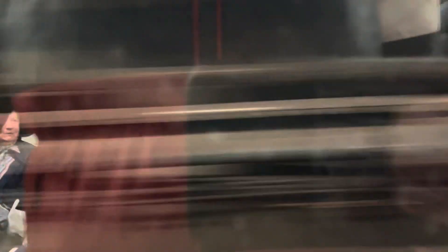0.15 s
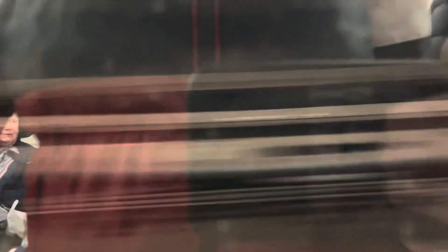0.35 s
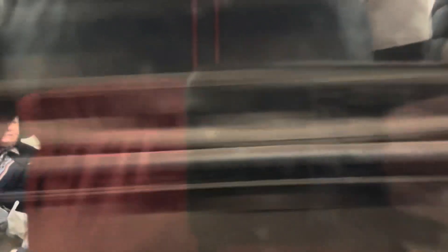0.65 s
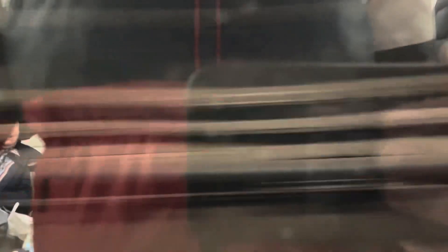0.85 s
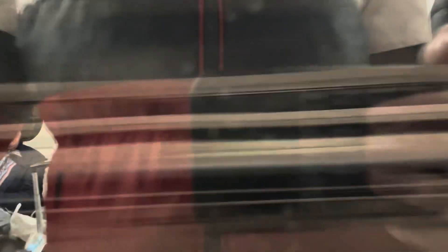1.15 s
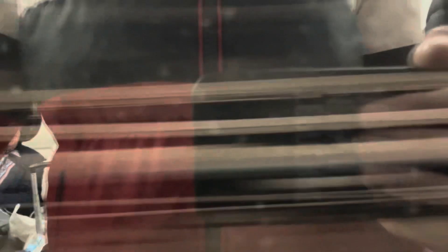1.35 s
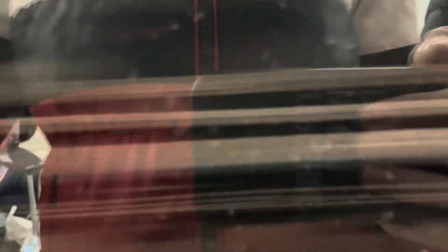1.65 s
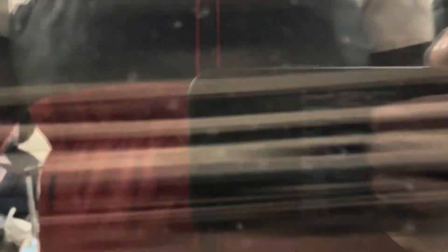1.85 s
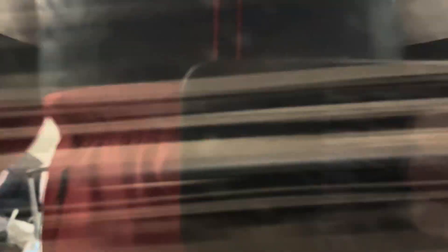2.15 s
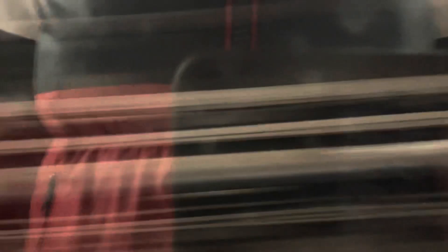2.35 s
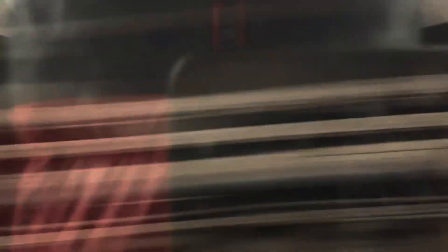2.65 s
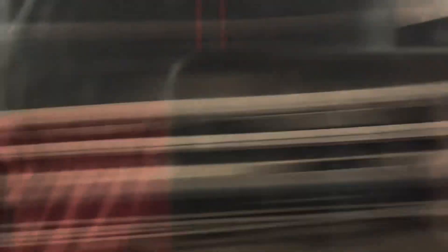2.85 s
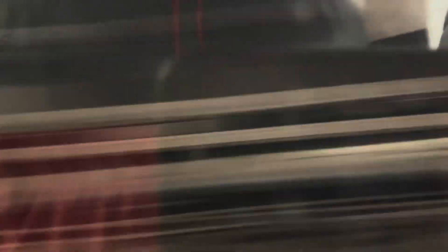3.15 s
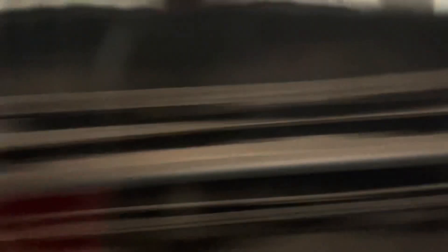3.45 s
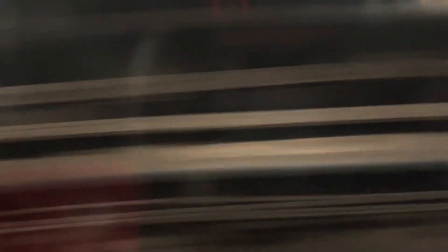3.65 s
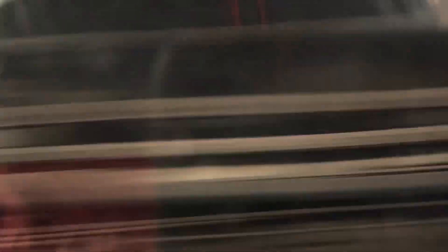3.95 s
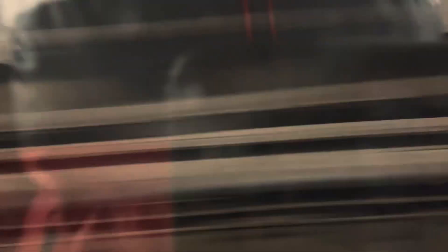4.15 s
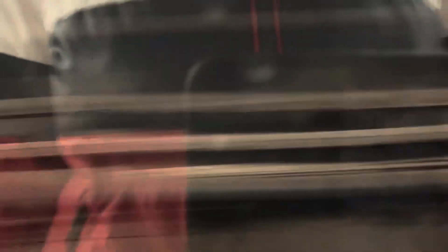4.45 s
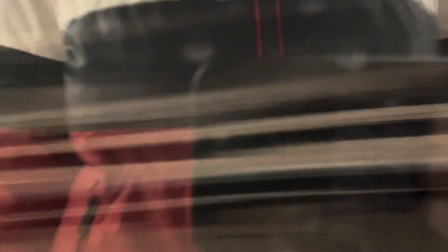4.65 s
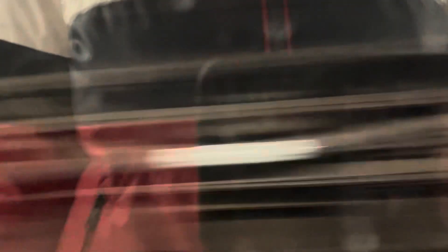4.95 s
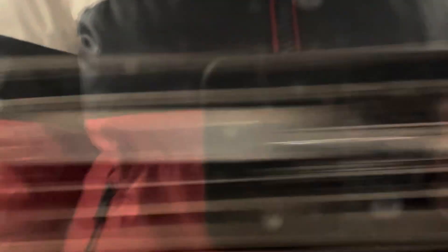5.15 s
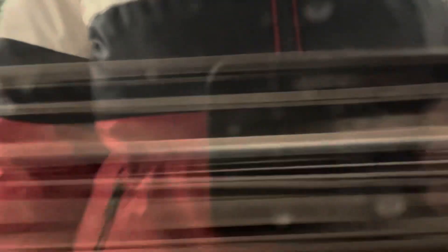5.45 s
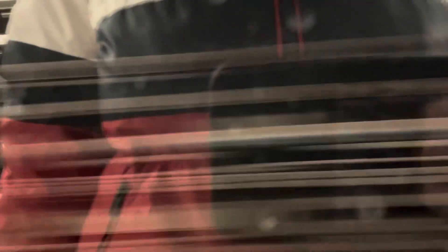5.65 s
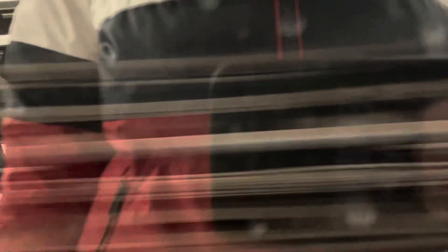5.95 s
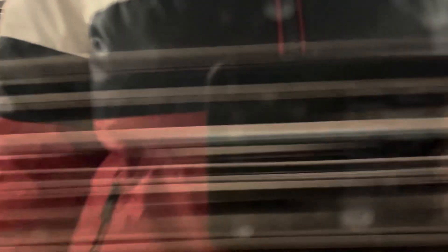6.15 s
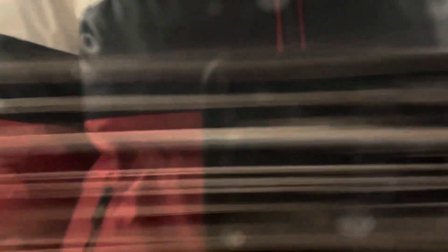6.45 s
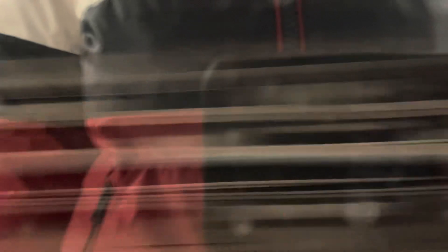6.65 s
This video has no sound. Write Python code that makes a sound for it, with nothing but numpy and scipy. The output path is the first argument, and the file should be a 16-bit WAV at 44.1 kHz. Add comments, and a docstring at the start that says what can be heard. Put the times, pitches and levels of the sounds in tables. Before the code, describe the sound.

Inside a metro car speeding steadily through a tunnel, wheels sing a wavering mid-low drone over deep rumble, roar and hiss, with brief metallic squeaks.

```python
"""Inside a metro train at steady speed in a tunnel, on two close microphone ports at a window seat.
From the start the wheels sing near 400 Hz on rippled rails: a wavering tone against narrow beating noise.
Under and around it, shaped noise makes the body's boom, rumble, panels, tunnel roar, ringing rails, hiss and air.
Scuffs of swelling grainy noise are there from the first moment, and low jolts come mostly after four seconds.
Squeaks, ragged gliding tones that ring on briefly in the car, cluster early and midway, with one near the end."""
import sys
import numpy as np
from scipy import signal
from scipy.fft import next_fast_len
from scipy.io import wavfile
from scipy.ndimage import uniform_filter1d

SR = 44100
rng = np.random.default_rng(int(sys.argv[2]) if len(sys.argv) > 2 else 0)


def generate_wav(sig):
    """Save sig (samples, or channels by samples) to the path in sys.argv[1] as 16-bit PCM at SR."""
    pcm = np.round(np.clip(np.atleast_2d(sig).T, -1, 1) * 32767).astype(np.int16)
    wavfile.write(sys.argv[1], SR, pcm)


N = 300757
TIME = np.arange(N) / SR


def undb(db):
    """Decibels to gain."""
    return 10 ** (np.asarray(db) / 20)


def curves(table):
    """Every column of a table of times, sample by sample."""
    s, *columns = np.transpose(table)
    return [np.interp(TIME, s, column) for column in columns]


def swells(table):
    """Change in dB: each (middle s, length s, dB) event builds and falls away as a smooth bell."""
    total_db = 0
    for s, length, db in table:
        phase = np.clip((TIME - s) / length, -.5, .5)
        total_db = total_db + db * np.cos(np.pi * phase) ** 2
    return total_db


def along(points, f):
    """Read (Hz, value) points on a log-frequency axis."""
    hz, value = np.transpose(points)
    return np.interp(np.log(f), np.log(hz), value)


def along_db(spectrum, f, skirt_db=12):
    """Gain of a (Hz, dB) spectrum; above its last point it falls by skirt_db an octave."""
    octaves_above = np.log2(np.maximum(f / spectrum[-1][0], 1))
    return undb(along(spectrum, f) - skirt_db * octaves_above)


def resonances(modes, f):
    """Gain of steep-sided resonances (Hz, width Hz, dB) whose powers add."""
    power = 0
    for hz, width, db in modes:
        detuning = (f - hz * hz / f) / width
        power = power + (undb(db) / (1 + detuning ** 2)) ** 2
    return np.sqrt(power)


# How alike the two microphone ports hear the car. Each row: frequency in Hz, shared part of the power (0-1).
LIKENESS = [(85, .978), (130, .9), (220, .9), (295, .52), (400, .64), (480, .65), (680, .12), (800, .42),
            (1200, .36), (2300, .6), (3000, .52), (3700, .2), (4700, .5), (5450, .15), (6400, .55),
            (7150, .3), (7600, .85), (8700, .95), (10000, .75), (12000, .7)]
# Which port hears the shared part first. Each row: frequency in Hz, lead of the left port in radians.
LEAD = [(60, 0), (620, 0.04), (790, 1.6), (1170, 1.52), (1500, 3.1), (1900, 4.5), (2600, 7.5), (3300, 8),
        (4150, 7), (5350, 7.5), (5700, 4.5), (6500, 5.7), (6900, 5.5), (7200, 3.5), (7600, 4.5),
        (9300, -5.5), (9800, 3), (11200, 1.03), (12400, 0.6)]
# Balance of the ports. Each row: frequency in Hz, left minus right in dB.
TILT = [(60, 1.0), (110, 0.84), (200, 0.93), (360, 2.4), (650, 2.0), (1180, 1.7), (2150, -0.72),
        (3900, 1.2), (7080, 0.12), (12900, -1.2)]


def cabin_noise(gain_at, size=N):
    """Complex noise of rms 1 at both ports: a shared part that reaches one port first, and a diffuse part."""
    n = next_fast_len(size)
    f = np.arange(1, n // 2) * SR / n
    shared, left, right = rng.standard_normal((3, len(f))) + 1j * rng.standard_normal((3, len(f)))
    alike = np.clip(along(LIKENESS, f), 0, 1)
    sides = np.array([[1], [-1]]) / 2
    direct = np.sqrt(alike) * shared * np.exp(1j * sides * along(LEAD, f))
    diffuse = np.sqrt(1 - alike) * np.array([left, right])
    ports = (direct + diffuse) * undb(sides * along(TILT, f))
    # positive frequencies alone give a complex noise
    z = np.fft.ifft(ports * gain_at(f), n)[:, :size]
    return z / z.real.std()


def even(z, span_s):
    """Hold the strength of a narrow noise steady over span_s; its quick beating stays."""
    k = max(int(span_s * SR), 1)
    power = np.abs(z.mean(axis=0)) ** 2 / 2
    power = uniform_filter1d(uniform_filter1d(power, k), k)
    return z / np.sqrt(power)


def walk(rate, size=N):
    """Random levels held 1 / rate s and slewed; spread 1."""
    k = max(int(SR / rate), 1)
    held = np.repeat(rng.standard_normal(size // k + 1), k)
    w = uniform_filter1d(held, k)[:size]
    return w / w.std()


def pitch_drift(offset_hz):
    """Complex turn that shifts a complex sound by a moving number of Hz."""
    return np.exp(2j * np.pi * np.cumsum(offset_hz) / SR)


def layer(gain_at, level_db, flutter_db, rate, wander_hz=0, wander_rate=7):
    """Cabin noise at a given level, fluttering and wavering in pitch as the track passes."""
    drift = pitch_drift(wander_hz * walk(wander_rate))
    return (cabin_noise(gain_at) * drift).real * undb(level_db + flutter_db * walk(rate))


def tunnel(x, patchy_db, size=2048, count=3):
    """Echoes off the passing wall, as patchy gain: narrow bands swell and sink for about a tenth of a second."""
    _, _, z = signal.stft(x, nperseg=size)
    patches = uniform_filter1d(rng.standard_normal(z.shape[1:]), count, axis=0)
    patches = uniform_filter1d(uniform_filter1d(patches, count, axis=1), count + 1, axis=1)
    gain = undb(patchy_db * patches / patches.std())
    gain = gain / np.sqrt(np.mean(gain ** 2))
    return signal.istft(z * gain, nperseg=size)[1][:, :N]


def add(out, s, sound):
    """Mix a sound in at time s."""
    i = max(int(s * SR), 0)
    out[:, i:i + sound.shape[1]] += sound[:, :N - i]


DRONE_HZ = 401.7  # usual pitch of the nearest wheel on the ripples
# Slow random wavering of the drone's pitch. Each row: time in seconds, Hz above the usual.
PITCH_WAVER = [(0, -1), (.2, -4), (.33, 3), (.7, -4), (.85, -4), (1.22, 2), (1.55, -2), (1.95, -3),
               (2.2, 3), (2.5, 3), (2.9, 2), (3.22, -7), (3.4, 2), (3.9, 1), (4.2, -5), (4.32, 3), (4.8, 2),
               (5.42, -6), (5.65, 1), (6.6, 1), (6.82, -6)]
# Random surges and dips of the drone's tone as it beats; the noise around it follows in part.
# Each row: middle in seconds, length in seconds, change in dB.
TONE_SURGES = [(.07, 0.15, 11.5), (.56, 0.058, 10.5), (.69, 0.1, 11), (.79, 0.12, -15), (1.33, 0.14, -8),
               (1.47, .09, 8), (2.84, 0.086, 12), (3.12, 0.14, -5.5), (3.28, .2, 7.5), (3.89, .09, 5),
               (4.02, .11, 7.5), (4.38, .1, -10), (4.73, 0.17, -8.5), (5.63, .11, 10), (5.73, 0.13, 14.5),
               (5.86, 0.16, 14), (6.12, 0.083, 11), (6.35, 0.13, 4), (6.49, 0.16, 10.5)]
# The wheels farther off. Each row: time in seconds, level in dB.
FAR_WHEELS = [(0, -20), (.5, -19), (1.1, -20.5), (1.65, -18.5), (2.15, -19), (2.7, -21), (3.5, -21.5),
              (3.8, -20), (4.1, -19.5), (4.85, -19.5), (5.15, -18.5), (5.9, -19), (6.82, -18.5)]
# Their narrow peak, its skirt and two shoulders. Each row: centre in Hz, width in Hz, level in dB.
DRONE_BANDS = [(401.1, 6.8, -4.5), (398.1, 55, -5.5), (382, 16, -9), (418, 16, -11)]


def drone(near_db=-27.0, near_pan_db=0.7, steady_s=0.047, wander_hz=1.7, wander_rate=14,
          flutter_db=3.0, flutter_rate=24, swell_share=0.14, sink_share=0.9):
    """The nearest wheel sings a tone that surges and sinks at random; narrow noise of the others beats with it."""
    offset_hz, = curves(PITCH_WAVER)
    far_db, = curves(FAR_WHEELS)
    surge_db = swells(TONE_SURGES)
    drift = pitch_drift(offset_hz + wander_hz * walk(wander_rate))
    pan = undb(np.array([[near_pan_db], [-near_pan_db]]) / 2)
    tone = np.sqrt(2) * np.exp(2j * np.pi * DRONE_HZ * TIME) * pan
    # in strong surges the tone flutters less
    flutter = flutter_db * walk(flutter_rate) * undb(-np.maximum(surge_db, 0))
    near = tone * undb(near_db + surge_db + flutter)
    far = even(cabin_noise(lambda f: resonances(DRONE_BANDS, f)), steady_s)
    far_share = np.where(surge_db > 0, swell_share, sink_share)
    far = far * undb(far_db + surge_db * far_share)
    return ((near + far) * drift).real


# Low modes of the car body around the seat. Each row: centre in Hz, width in Hz, level in dB.
BODY = [(50.4, 18, -10.5), (70, 6.5, 2.5), (83.3, 12, -6.5)]
# Dips in the track that bounce the body. Each row: peak in seconds, length in seconds, rise in dB.
BOUNCES = [(.07, .14, 10), (.22, .17, 8), (.68, .24, 3.5), (1.16, .16, 11), (1.55, 0.47, 4.5),
           (2.65, 0.27, 6.5), (3.24, 0.099, 6), (3.5, 0.39, 6.5), (4.58, .13, 5.5), (5.25, 0.41, 3.5),
           (6.07, 0.37, 7.5), (6.68, .22, 3.5)]


def boom(boom_db=-31, steady_s=0.11):
    """The bogies shake the low modes of the car body, harder at each dip in the track."""
    body = even(cabin_noise(lambda f: resonances(BODY, f)), steady_s).real
    return body * undb(boom_db + swells(BOUNCES))


# Rolling noise from under the floor. Each row: frequency in Hz, dB per Hz.
RUMBLE = [(18, -30), (30, -9), (60, 0), (100, -2.5), (118, -2.5), (135, 0.5), (148, -1.5), (160, 1),
          (172, -4.5), (260, -11.5), (600, -50.5)]


def rumble(rumble_db=-27.5):
    """Rough steel on steel rumbles under the floor as low noise of nearly even level."""
    return layer(lambda f: along_db(RUMBLE, f), rumble_db, flutter_db=0.5, rate=6.5)


# Spectrum of the shaking floor panels. Each row: frequency in Hz, dB per Hz.
PANELS = [(120, -30.5), (172, -11.5), (195, -0.5), (255, 1), (275, 0), (320, 1), (340, -3), (460, -4.5),
          (600, -20.5), (1200, -47)]
# Jolts that shake them. Each row: peak in seconds, length in seconds, rise in dB.
JOLTS = [(3.43, 0.24, 5), (4.44, 0.15, 3), (5.44, 0.1, 4), (6.16, 0.14, 3), (6.28, 0.1, 4.5),
         (6.42, 0.15, 2)]


def panels(rough_db, panels_db=-24.0, follow=1.5):
    """Rough rails and jolts shake the floor panels, whose level follows roughness more than one for one."""
    level_db = panels_db + follow * rough_db + swells(JOLTS)
    return layer(lambda f: along_db(PANELS, f), level_db, flutter_db=0.86, rate=9)


# Roar heard off the tunnel wall. Each row: frequency in Hz, dB per Hz.
ROAR = [(300, -21), (460, -2), (550, 1.5), (680, -4), (850, -6), (970, -10), (1320, -10.5), (1500, -12.5),
        (1800, -21), (2400, -29.5), (5000, -64)]
# Overtones of the ripple drone. Each row: centre in Hz, width in Hz, level in dB.
OVERTONES = [(780.4, 86, 0), (1199, 74, -6.5), (1316, 47, -10.5), (1619, 90, -10)]


def roar(rough_db, roar_db=-27.0, overtones_db=-33.5):
    """Rolling roar and the drone's wavering overtones follow the roughness and come patchy off the wall."""
    broad = layer(lambda f: along_db(ROAR, f), roar_db + rough_db, flutter_db=0.74, rate=18)
    overtones = layer(lambda f: resonances(OVERTONES, f), overtones_db + rough_db,
                      flutter_db=1.8, rate=9, wander_hz=6.995)
    return tunnel(broad + overtones, patchy_db=1.12)


# Ringing of the rails below the car. Each row: time in seconds, level in dB.
RAIL_RING = [(0, -40.5), (.7, -43), (1.05, -41.5), (1.75, -43.5), (3.05, -40.5), (3.7, -38.5), (4.2, -38.5),
             (4.6, -40.3), (5.15, -40.5), (6.1, -39.5), (6.82, -41)]
# Its broad spectrum. Each row: frequency in Hz, dB per Hz.
RING = [(900, -29), (1600, -3), (1800, 1.5), (2030, 0), (2350, -3.5), (2500, -4), (3050, -7), (3800, -18.5),
        (6000, -50)]
# Modes that stand out of it. Each row: centre in Hz, width in Hz, level in dB.
RAIL_MODES = [(2003, 65, 1.5), (2087, 80, -4.5), (2330, 190, -6)]
# Hiss of the rolling steel. Each row: time in seconds, level in dB.
HISS_LEVEL = [(0, -44), (.55, -45), (1.1, -44.5), (1.8, -45.5), (2.6, -45), (4.1, -45), (5.2, -45.5),
              (5.8, -44.5), (6.82, -44.5)]
# Its spectrum. Each row: frequency in Hz, dB per Hz.
HISS = [(1800, -14), (3050, 0), (3800, -2.5), (5250, -5.5), (5550, -8.5), (5950, -6), (6900, -9.5),
        (7800, -25.5), (10500, -23), (13000, -31)]


def rail_ring_and_hiss(modes_db=-5):
    """Rails ring broadly and in a few wavering modes, with rolling hiss above; all come patchy off the wall."""
    ring_db, = curves(RAIL_RING)
    hiss_db, = curves(HISS_LEVEL)
    ring = layer(lambda f: along_db(RING, f), ring_db, flutter_db=0.68, rate=22)
    modes = layer(lambda f: resonances(RAIL_MODES, f), ring_db + modes_db,
                  flutter_db=2.0, rate=36, wander_hz=9)
    hiss = layer(lambda f: along_db(HISS, f), hiss_db, flutter_db=0.74, rate=16)
    return tunnel(ring + modes + hiss, patchy_db=1.93)


# Air at the seals of the car. Each row: frequency in Hz, dB per Hz.
AIR = [(3000, -10.5), (6500, -1.5), (7300, 12.5), (8500, 0), (10000, 5), (11500, 6.5), (12300, 0.5),
       (13400, -15.5)]


def seal_air(air_db=-56.5):
    """Air at the seals makes a faint, slightly fluttering treble noise."""
    return layer(lambda f: along_db(AIR, f), air_db, flutter_db=0.8, rate=17)


# Scuffs, rattles and bumps of the running gear under the seat.
# Each row: start in seconds, length in seconds, centre in Hz, width in Hz, level at the peak in dB.
SCUFFS = [(0.0, 0.36, 4800, 3020, -48), (.05, 0.17, 9500, 4000, -52), (0.606, 0.027, 2030, 160, -37),
          (.85, .13, 2830, 1300, -38), (.865, .11, 1310, 400, -33), (.878, .06, 2164, 60, -35),
          (.912, 0.086, 1750, 900, -37), (0.957, .055, 3500, 2200, -39.8), (1.077, 0.084, 2300, 1800, -42),
          (1.555, .11, 10000, 4500, -51), (3.657, 0.33, 11500, 5000, -59), (4.413, 0.096, 324, 35, -20),
          (6.095, .14, 850, 900, -28.5), (6.09, .13, 4500, 4000, -51), (6.131, .11, 233, 50, -19),
          (6.254, .1, 257, 130, -20), (6.25, 0.12, 720, 400, -35), (6.307, .015, 12000, 2500, -56.5)]


def scuffs(rise=0.13, grain_db=2.0, grain_rate=160):
    """Rubbing and jolts: grainy noise that swells fast and dies away, mostly broad, though a few narrow bands
    ring briefly near one pitch."""
    out = np.zeros((2, N))
    for s, length, hz, width, db in SCUFFS:
        n = int(length * SR)
        rub = cabin_noise(lambda f: resonances([(hz, width, 0)], f), size=n).real
        swell = np.interp(np.linspace(0, 1, n), [0, rise, 1], [0, 1, 0])
        add(out, s, rub * swell * undb(db + grain_db * walk(grain_rate, n)))
    return out


CAR_T60_S = .32  # time for the car's reverberation to fall by 60 dB
# Squeaks of sliding metal, heard through the car. Each row: start in seconds, length in seconds, pitch in Hz,
# level in dB, glide and jitter as shares of the pitch, upper mode in Hz, its level in dB against the main tone.
SQUEAKS = [(.1, 0.076, 6500, -43, 0, .024, 10100, -14), (.17, 0.055, 6680, -49, .04, .014, 10100, -14),
           (0.343, 0.056, 7600, -52, .03, .016, 10050, -1), (0.535, 0.04, 6460, -50, 0, .016, 12980, -21),
           (.865, .045, 7200, -52, 0.0063, .02, 9500, -5),
           (1.037, 0.075, 7150, -48, -0.028, .026, 9800, -5),
           (1.631, 0.055, 6370, -47.5, .03, .014, 12740, -22),
           (3.449, .048, 6720, -37, 0.086, .009, 13400, -23),
           (3.48, .075, 6820, -42, 0.018, .026, 13600, -22),
           (3.492, 0.041, 6480, -39.5, .04, .014, 13120, -22),
           (3.535, .065, 6480, -45.5, -.04, .024, 13000, -22),
           (3.833, .075, 6240, -48, -.02, .036, 12440, -20),
           (6.09, .055, 7150, -53, -0.007, .02, 9500, -10)]


def squeaks(jitter_rate=800):
    """Metal sticks and slips: a ragged tone that glides, smeared by the car's reverberation."""
    out = np.zeros((2, N))
    tail_t = TIME[:int(CAR_T60_S * SR)]
    for s, length, hz, db, glide, jitter, upper_hz, upper_db in SQUEAKS:
        u = np.linspace(0, 1, int(length * SR))
        pitch = 1 + glide * (u - .5) + jitter * walk(jitter_rate, len(u))
        turn = 2 * np.pi * np.cumsum(pitch) / SR
        swell = np.sqrt(2 * np.sin(np.pi * u).clip(0))
        tone = swell * (np.sin(hz * turn) + undb(upper_db) * np.sin(upper_hz * turn))
        # the car answers with a dense, dying tail of unit energy
        decay = np.exp(-np.log(1000) * tail_t / CAR_T60_S)
        car = cabin_noise(np.ones_like, size=len(tail_t)).real * decay
        car /= np.sqrt(np.sum(car ** 2) / 2)
        add(out, s, signal.fftconvolve(tone[None], car, axes=1) * undb(db))
    return out


# Roughness of the rails under the car, which drives roar, overtones and panels together.
# Each row: time in seconds, dB above the usual.
TRACK = [(0, 1), (.7, 0.16), (1.7, -1), (2.3, 0), (2.9, -1.23), (4.0, 0), (4.9, -0.05), (5.7, 0.6),
         (6.35, 1.2), (6.82, 0.5)]


def scene():
    """Everything heard in the car."""
    rough_db, = curves(TRACK)
    rolling = rumble() + panels(rough_db) + roar(rough_db) + rail_ring_and_hiss() + seal_air()
    return drone() + boom() + rolling + scuffs() + squeaks()


TOP_HZ = 13200  # highest frequency the phone passes


def record(dry):
    """The phone cuts the top with a steep low-pass filter."""
    top_cut = signal.ellip(8, .2, 70, TOP_HZ, fs=SR, output="sos")  # order, ripple dB, stopband dB
    return signal.sosfilt(top_cut, dry)


dry = scene()
out = record(dry)
generate_wav(out)
```